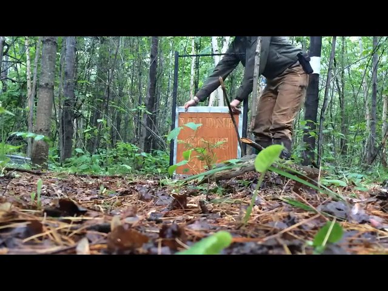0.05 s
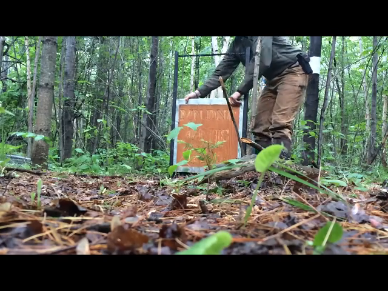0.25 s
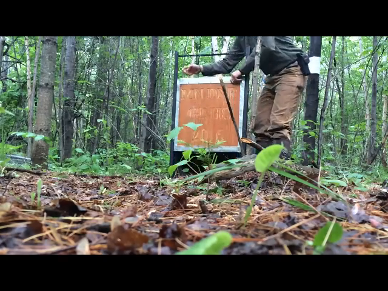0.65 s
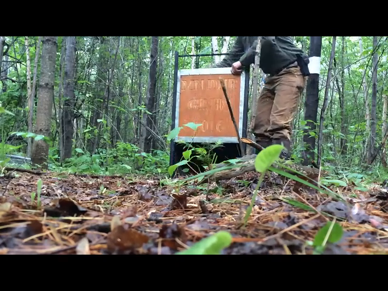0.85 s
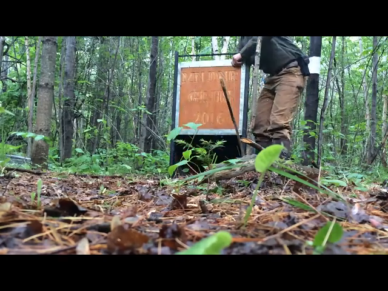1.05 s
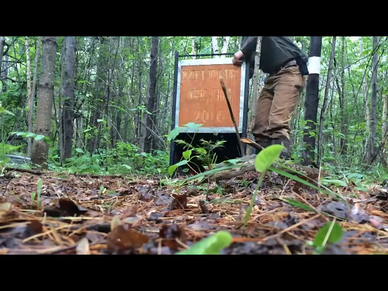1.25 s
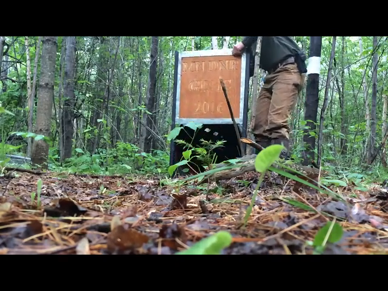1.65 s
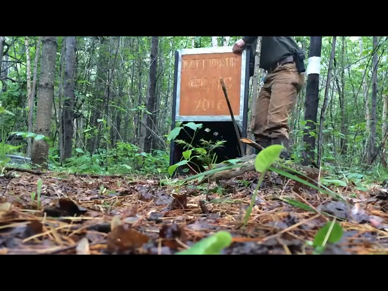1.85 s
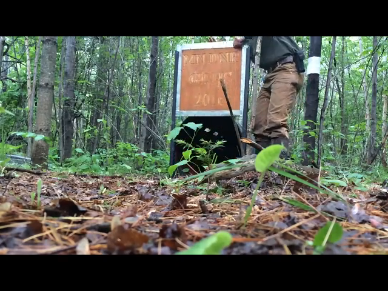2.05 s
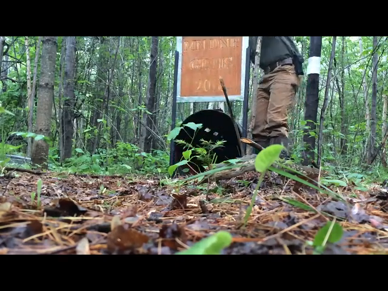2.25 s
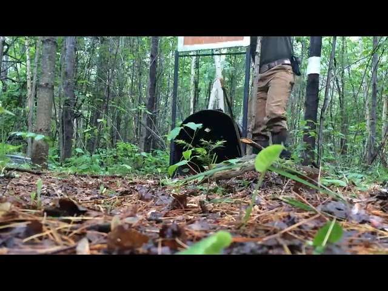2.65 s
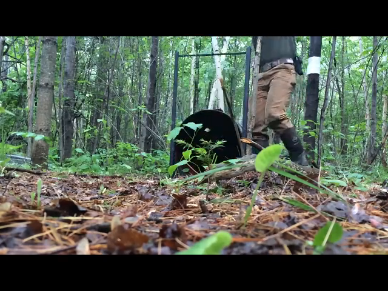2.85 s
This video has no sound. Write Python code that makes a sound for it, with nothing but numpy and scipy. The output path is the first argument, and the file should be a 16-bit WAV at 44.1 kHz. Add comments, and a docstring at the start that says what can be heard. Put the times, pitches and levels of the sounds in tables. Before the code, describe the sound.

A sheet-metal trap door scrapes and rattles upward, a few metres away in a still forest. It jerks with booming knocks at about 0.2 seconds, then slides with gritty snaps until it jams and knocks around 1.3. A softer nudge follows from 1.5 to 2. A brighter scrape starts at 2.1, knocking loudest near 2.4, then fades by 3 with brief thin squeaks and a faint rustle of leaves and cloth.

```python
"""A sheet-metal trap door is worked up its frame in four pulls, a few metres away in a still forest.
Its edges stick and slip in the rails, driving the panel's modes so that it booms and rattles;
it knocks when it jams and as it clears the frame. Grit snaps and hisses, bare edges sing briefly
and a rail clinks. Leaves and cloth rustle as the lifter shifts, and the trees return a faint echo."""
import sys
import numpy as np
from scipy import signal
from scipy.fft import rfft, irfft
from scipy.io import wavfile
from scipy.ndimage import uniform_filter1d

SR = 44100
rng = np.random.default_rng(int(sys.argv[2]) if len(sys.argv) > 2 else 0)


def wav_record(signal):
    """Record a signal, one row per channel, as 16-bit PCM in the file named by sys.argv[1]."""
    frames = np.transpose(np.atleast_2d(signal))
    bounded = np.clip(frames, -1, 1)
    # unit amplitude maps onto the largest positive 16-bit level
    quanta = np.round(bounded * 32767).astype(np.int16)
    wavfile.write(sys.argv[1], SR, quanta)


N = 132300

# spectral envelope of the metal sheet: (frequency [Hz], relative level [dB])
SHEET_SPECTRUM = [(25, -27), (55, -10.5), (95, 6), (210, 6.5), (285, -1.5), (370, 3), (620, -3),
                  (780, -6.5), (1080, -6), (1800, -16), (2800, -22), (4800, -28.5), (7000, -27.5),
                  (9300, -31.5), (11500, -34.5), (16000, -42.5)]


def amp(db):
    return 10 ** (np.asarray(db) / 20)


def unit_rms(x):
    return x / np.sqrt(np.mean(x ** 2) + 1e-20)


def unit_energy(x):
    return x / (np.linalg.norm(x) + 1e-12)


def decay(t, t60):
    """Exponential damping: the level falls 60 dB in t60 seconds."""
    return np.exp(-np.log(1000) * t / t60)


def curve(points, hz):
    """Interpolation of (frequency [Hz], value) points on a logarithmic frequency axis."""
    f, value = np.transpose(points)
    return np.interp(np.log(hz + 1), np.log(f + 1), value)


def add(mix, start, sound):
    """Superposition: the sound joins the mix at start seconds."""
    part = mix[max(round(start * SR), 0):][:len(sound)]
    part += sound[:len(part)]


def colour(x, gain, size=4096):
    """Minimum-phase filtering: the causal response whose magnitude is gain(frequency)."""
    log_gain = np.log(np.maximum(gain(abs(np.fft.fftfreq(size, 1 / SR))), 1e-5))
    taps = np.fft.ifft(np.exp(np.conj(signal.hilbert(log_gain)))).real
    return signal.fftconvolve(x, taps[:size // 2])[:len(x)]


def flicker(depth_db, rate_hz):
    """Random amplitude modulation: a gain whose level follows low-passed noise."""
    rolloff = 1 + (np.fft.rfftfreq(N, 1 / SR) / rate_hz) ** 2
    drift = unit_rms(irfft(rfft(rng.standard_normal(N)) / rolloff, N))
    return amp(depth_db * drift)


def contact_ripple(hz, depth_db=0.6):
    """Position-dependent coupling: each point of contact has its own spectral peaks and dips."""
    grid_hz = np.arange(0, 23000, 260)
    ripple = np.interp(hz, grid_hz, rng.standard_normal(len(grid_hz)))
    return amp(-depth_db * ripple * np.minimum(hz / 2500, 1))


def diffuse_tail(decay_times, size=22050):
    """Modal overlap: dense modes merge into noise of flat spectrum, each band dying at its own rate."""
    t, hz = np.arange(size) / SR, np.fft.rfftfreq(size, 1 / SR)
    noise, out = rfft(rng.standard_normal(size)), 0
    for centre_hz, t60 in decay_times:
        share = curve([(f, float(f == centre_hz)) for f, _ in decay_times], hz)
        out += irfft(noise * share, size) * unit_energy(decay(t, t60))
    power = uniform_filter1d(abs(rfft(out)) ** 2, size=41)
    return unit_energy(colour(out, lambda f: np.interp(f, hz, abs(power) + 1e-12) ** -.5))


def band(x, k):
    """Band-pass filtering: keeps the rumble, boom, body, rasp or hiss (k = 0 to 4)."""
    edges_hz = (0, 140, 280, 800, 3200, 0)
    for hz, kind in zip(edges_hz[k:], ("high", "low")):
        if hz:
            x = signal.sosfilt(signal.butter(4, hz, kind, fs=SR, output="sos"), x)
    return x


def forest_air():
    """Ambient noise: still air among the trees is a steady floor, strongest in the bass."""
    # spectrum of the air: (frequency [Hz], relative level [dB])
    spectrum = [(20, -24), (70, 4.5), (190, -4.5), (300, -8.5), (520, -4.5), (1000, -12.5), (2000, -20),
                (6000, -24), (16000, -28.5)]
    return amp(-61.5) * unit_rms(colour(rng.standard_normal(N), lambda f: amp(curve(spectrum, f))))


def tree_echo(source):
    """Scattering: many reflections from the trees merge into a faint reverberation."""
    # reverberation of the forest: (frequency [Hz], T60 [s])
    decay_times = [(100, 1), (1000, 0.2), (6000, 0.33), (15000, 0.43)]
    return amp(-12) * signal.fftconvolve(source, diffuse_tail(decay_times))


def rustles():
    """Friction noise: leaves and cloth give soft swells of fine, bright crackle."""
    # shifts of the lifter: (time [s], duration [s], level [dB])
    shifts = [(1.528, 0.14, -57), (2.696, 0.083, -51), (2.818, .13, -53.5)]
    # spectrum of the crackle: (frequency [Hz], relative level [dB])
    spectrum = [(500, -13), (3000, -3.5), (7000, -6), (11000, 0), (16000, -0.5)]
    swell = np.zeros(N)
    for start, length, db in shifts:
        add(swell, start, amp(db) * np.sin(np.pi * np.arange(0, length, 1 / SR) / length))
    crackle = rng.standard_normal(N) * flicker(depth_db=2.5, rate_hz=300)
    return swell * unit_rms(colour(crackle, lambda f: amp(curve(spectrum, f))))


def rail_clinks():
    """Beating: the struck rail rings in two damped modes of nearly equal frequency."""
    # strikes on the rail: (time [s], peak level [dB])
    strikes = [(0.371, -37.5), (1.4445, -40)]
    out, t = np.zeros(N), np.arange(SR // 5) / SR
    pair = np.mean([np.sin(2 * np.pi * hz * t) for hz in (2510, 2598)], axis=0)
    for start, db in strikes:
        add(out, start, amp(db) * pair * decay(t, t60=0.044))
    return out


def rail_hiss():
    """Sliding friction: fine grit in the rails makes noise that flickers in level and colour."""
    grit = rng.standard_normal(N) * flicker(depth_db=1.4, rate_hz=248)
    spectra = signal.stft(grit, nperseg=512, noverlap=384)[2]
    patches = uniform_filter1d(rng.standard_normal(spectra.shape), size=4, axis=0)  # across frequency
    patches_db = 3 * unit_rms(uniform_filter1d(patches, size=11, axis=1))  # across time
    grit = signal.istft(spectra * amp(patches_db), nperseg=512, noverlap=384)[1][:N]
    return colour(grit, lambda f: amp(curve(SHEET_SPECTRUM, f)))


def grit_snaps():
    """Broadband transients: grit cracks between door and rail in short, bright bursts."""
    # cracks of grit: (time [s], relative level [dB], relative top-octave level [dB])
    cracks = [(0.0583, -31.5, -8.5), (0.1862, -25.5, -10.5), (0.3696, -31, -11), (0.659, -27, -13),
              (0.911, -24.5, -8), (0.9347, -29.5, -27), (1.008, -27, -4), (1.0887, -29.5, -25),
              (1.264, -42, -18), (1.306, -30, -21), (1.4436, -46, -17), (1.564, -42, -9), (2.249, -23, -10),
              (2.4433, -26, -28), (2.5534, -26.5, -31)]
    # spectrum of a crack: (frequency [Hz], relative level [dB])
    spectrum = [(200, 8), (1500, -8), (3000, -9), (4200, -3), (5000, -2.5), (6600, 4), (8500, 2),
                (11000, -3), (14000, -7), (16000, -2.5)]
    out, t = np.zeros(N), np.arange(SR // 8) / SR
    for start, db, top_db in cracks:
        burst = rng.standard_normal(len(t)) * decay(t, t60=0.036)
        shelf = [(8000, 0), (12000, top_db + 16)]
        crack = colour(burst, lambda f: contact_ripple(f) * amp(curve(spectrum, f) + curve(shelf, f)))
        add(out, start, amp(db + 12.5) * unit_energy(crack))
    return out


def squeaks():
    """Resonance: chattering friction briefly drives one mode of the panel or of a bare edge."""
    # driven modes: (time [s], duration [s], frequency [Hz], bandwidth per filter pass [Hz], level [dB])
    resonances = [(0.334, 0.062, 9700, 900, -58.5), (0.459, 0.096, 1570, 220, -45),
                  (0.463, 0.059, 7730, 160, -55), (0.461, .09, 8400, 1000, -51.5),
                  (.652, 0.055, 409, 81, -29), (0.927, 0.015, 6520, 300, -44),
                  (1.096, 0.0091, 6460, 300, -50), (1.269, 0.049, 7560, 4500, -54.5),
                  (2.166, .17, 645, 56, -35.5), (2.526, 0.025, 9300, 400, -45),
                  (2.585, 0.096, 9320, 220, -50), (2.60, 0.036, 6320, 99, -56),
                  (2.711, 0.028, 5400, 199, -43.5), (2.715, 0.056, 3150, 700, -51),
                  (2.706, 0.04, 9300, 1600, -48.5)]
    attack_s, release_s = 0.0083, 0.0033
    out, t = np.zeros(N), np.arange(SR // 4) / SR
    chatter = flicker(depth_db=-0.5, rate_hz=110)
    for start, length, hz, width_hz, db in resonances:
        noise = rng.standard_normal(len(t)) + 1j * rng.standard_normal(len(t))
        drive = noise * np.roll(chatter, -round(start * SR))[:len(t)]
        pole = np.exp(-np.pi * width_hz / SR)
        for _ in range(2):
            drive = signal.lfilter([1 - pole], [1, -pole], drive)
        tone = (drive * np.exp(2j * np.pi * hz * t)).real  # shifts the narrow band up to the mode
        envelope = np.minimum(t / attack_s, 1) * np.exp(-np.maximum(t - length, 0) / release_s)
        add(out, start, amp(db) * envelope * unit_rms(tone))
    return out


def door_ring():
    """Impulse response at one point of the door: a first push, a dense ring and distinct modes."""
    # bending modes of the door: (frequency [Hz], relative energy [dB], T60 [s])
    door_modes = [(112, -6.5, 0.092), (160, -9, 0.074), (205.7, -5, 0.25), (364.2, -3, 0.067),
                  (428.3, -8, 0.2), (469.6, -17, 0.48), (596, -13.5, 0.48), (647.6, -8, 0.11),
                  (1035, -8, 0.067), (1175, -27, 0.083), (1187, -31, 0.12), (1496, -23, 0.18),
                  (1955, -25.5, 0.23), (2200, -33, 0.23), (3430, -26.5, 0.24)]
    # damping of the sheet's dense ring: (frequency [Hz], T60 [s])
    decay_times = [(100, 0.063), (500, 0.098), (1500, 0.059), (5000, 0.011), (15000, 0.028)]
    first_push, detune, sheet_db = 0.87, 0.0062, 8
    dense = diffuse_tail(decay_times, size=8192)
    dense[0] += first_push
    sheet = colour(dense, lambda f: amp(curve(SHEET_SPECTRUM, f)) * contact_ripple(f))
    ring = amp(sheet_db) * unit_energy(sheet)
    t = np.arange(len(ring)) / SR
    for hz, db, t60 in door_modes:
        polarity = rng.choice([-1, 1])
        hz *= 1 + detune * rng.standard_normal()
        ring += amp(db) * polarity * unit_energy(np.sin(2 * np.pi * hz * t) * decay(t, t60))
    return unit_energy(ring)


def door_knocks():
    """Impact excitation: each knock rings the door with its own loudness, boom and brightness."""
    # bumps on the frame: (time [s], relative level [dB], boom [dB], tilt [dB/octave], rebound [dB])
    bumps = [(.214, -8.5, 16.5, 0.5, 0.5), (0.277, -2.5, 3.5, -0.5, -1), (0.292, -12.5, 9, -1, -2),
             (0.32, -19, -3, -2, -2), (0.441, -9.5, -3, 0.5, 1.5), (.594, -7, -21, -1.5, 1.5),
             (0.663, -6, -2, 2, -2), (0.671, -4, -1.5, -8, 1), (.797, -3, -5, -3.5, -31),
             (1.077, -19, -23, 0, -10), (1.221, -18, -1, -5, -14), (1.266, -2, -2, 0.5, -33),
             (1.280, -2, -1, -1, -29), (1.297, -8.5, 7.5, -1, 0.5), (1.3895, -11, 0.5, 1, -10),
             (1.4447, -4, 10, 0.5, -37), (1.494, -14, -5, -1, -9), (1.709, -16.5, -20, -2, -9),
             (1.734, -28, 0, -5, -15), (2.073, -9.5, 5, -3.5, -8), (2.113, -18, -5, -14, -10),
             (2.138, -8, -10, -2.5, -8), (2.245, -13, 16, -4, -11), (2.326, -10, -11, -19, -15),
             (2.425, 1.5, -23, -3, 1), (2.447, 1, -15, 1.5, -9)]
    cutoff_hz, rebound_s = 4400, 0.007
    out = np.zeros(N)
    for start, db, boom_db, tilt, rebound_db in bumps:
        def contact(f):
            treble_db = tilt * np.log2(np.maximum(f, 300) / 500)
            bass_db = curve([(200, boom_db), (320, 0)], f)
            return amp(treble_db + bass_db) / (1 + (f / cutoff_hz) ** 7)
        blow = amp(db - 1) * unit_energy(colour(door_ring(), contact))
        add(out, start, blow)
        add(out, start + rebound_s * rng.uniform(.6, 1.5), amp(rebound_db) * blow)
    return out


def panel_rattle(slips_per_s=1400, spread_db=3, smooth_share=0.66, contacts=36):
    """Stick-slip excitation: tiny uneven slips ring the panel from a moving point of contact."""
    slips = (rng.random(N) < slips_per_s / SR) * rng.choice([-1, 1], N)
    slips = slips * amp(spread_db * np.minimum(rng.exponential(1, N), 3.5))
    friction = unit_rms(slips) + smooth_share * rng.standard_normal(N)
    hop = N // contacts + 1
    crossfade = np.sin(np.pi * np.arange(2 * hop) / (2 * hop))
    friction, out = np.pad(friction, (hop, 2 * hop)), np.zeros(N + hop)
    for at in range(0, N + hop, hop):
        add(out, at / SR, signal.fftconvolve(friction[at:at + 2 * hop] * crossfade, door_ring()))
    return out[hop:]


def door_scrape():
    """Forced vibration: four pulls shape the rattle and hiss band by band; judder modulates the sum."""
    # relative band levels of each pull: (time [s], rumble [dB], boom [dB], body [dB], rasp [dB], hiss [dB])
    jerk = [(0.235, -33.5, -37, -38, -64, -57), (0.251, -45, -55, -60, -57, -49.5),
            (0.275, -32, -43, -39, -39.5, -51), (0.295, -25, -56, -34, -38.5, -47),
            (0.333, -37, -43, -33.5, -42.5, -58), (0.361, -44, -56, -41.5, -61, -55),
            (0.373, -39, -59, -45, -56, -55), (0.387, -39, -45, -46, -57, -60),
            (0.415, -58, -45, -58, -56, -56.5)]
    lift = [(0.42, -43, -52, -68, -57, -60), (0.444, -51, -32.5, -35.5, -45.5, -52.5),
            (0.468, -59, -31.5, -33, -48, -64), (0.5, -39.5, -38.5, -35.5, -39.5, -43.5),
            (0.624, -66, -27.5, -32.5, -42.5, -55), (0.676, -57, -27.5, -37, -41.5, -52),
            (0.704, -38, -31, -36, -49, -55.5), (0.738, -58, -31, -31, -43.5, -57.5),
            (0.774, -42, -30.5, -31.5, -44.5, -52), (0.858, -39, -36, -32.5, -47.5, -49),
            (0.958, -42, -29.5, -30.5, -44, -52.5), (0.972, -37, -35, -32.5, -46.5, -51),
            (1.044, -73, -33.5, -32.5, -42, -54.5), (1.08, -30, -32.5, -33.5, -43.5, -53.5),
            (1.19, -41.5, -36.5, -38, -51, -59), (1.245, -41, -46, -47, -58.5, -70)]
    nudge = [(1.52, -65, -51, -59, -63, -62.5), (1.59, -71, -49, -48, -60.5, -62.5),
             (1.694, -81, -45, -48, -62.5, -60), (1.736, -44, -36, -38, -44.5, -54.5),
             (1.778, -45, -43, -41, -48, -53.5), (1.936, -50, -47.5, -53, -70, -63),
             (1.974, -45.5, -69, -68, -84, -76), (2.0, -80, -73, -73, -86, -88)]
    release = [(2.03, -61, -80, -75, -90, -90), (2.078, -36, -46, -40, -46, -55.5),
               (2.11, -41, -32.5, -36.5, -55.5, -62), (2.138, -34, -56, -44, -45.5, -56.5),
               (2.172, -36, -31, -32.5, -37.5, -49.5), (2.228, -51, -36, -32.5, -41.5, -48.5),
               (2.246, -55, -31, -30, -37, -41.5), (2.334, -42, -43.5, -29, -33, -44),
               (2.412, -47, -38, -35.5, -40, -44.5), (2.432, -51, -38, -26, -30, -40),
               (2.472, -61, -33, -30, -33.5, -42.5), (2.57, -49, -39.5, -38.5, -43.5, -42),
               (2.632, -52, -45, -39.5, -32.5, -37.5), (2.712, -69, -50, -48.5, -53, -48.5),
               (2.742, -56.5, -51.5, -43, -56, -43), (2.816, -60.5, -59, -60, -66, -65.5),
               (2.836, -64, -103, -55, -76, -67), (3.0, -72, -45.5, -54, -68, -56.5)]
    pulls = [np.array(pull) for pull in (jerk, lift, nudge, release)]
    out, t = np.zeros(N), np.arange(N) / SR
    sources = [panel_rattle()] * 4 + [rail_hiss()]  # the panel fills the four lower bands
    for k, source in enumerate(sources):
        envelope = sum(amp(np.interp(t, pull[:, 0], pull[:, k + 1], -120, -120)) for pull in pulls)
        part = band(source, k)
        running_rms = np.sqrt(uniform_filter1d(part ** 2, size=2200) + 1e-12)
        out += amp(-1) * uniform_filter1d(envelope, size=200) * part / running_rms
    judder = unit_rms(flicker(depth_db=1.22, rate_hz=40.3))
    return out * judder


def scene():
    """Superposition: the door's direct sound, the background and the delayed echo add in one channel."""
    door = door_scrape() + door_knocks() + grit_snaps() + squeaks() + rail_clinks()
    out = door + rustles() + forest_air()
    add(out, start=0.012, sound=tree_echo(door))
    return out[None]


def record(dry, low_cut_hz=34, high_cut_hz=15600):
    """Band limiting: two filters remove the deepest rumble and the highest treble."""
    thinned = signal.sosfilt(signal.butter(2, low_cut_hz, "high", fs=SR, output="sos"), dry)
    low_pass = signal.firwin(301, high_cut_hz, window=("kaiser", 9), fs=SR)
    return signal.oaconvolve(thinned, low_pass[None], "same")


dry = scene()
out = record(dry)
wav_record(out)
```